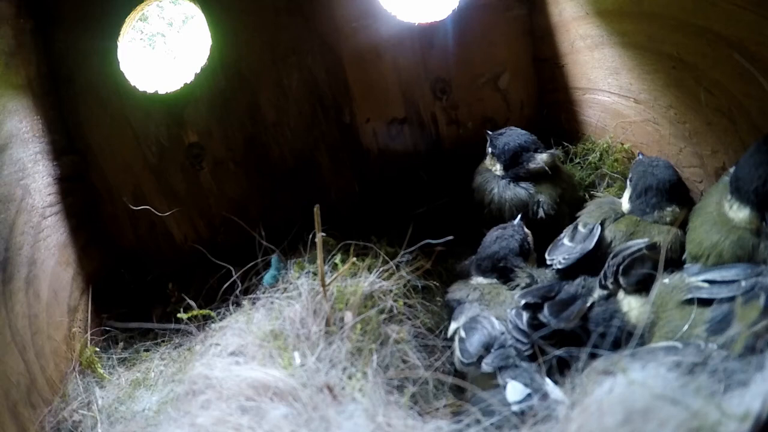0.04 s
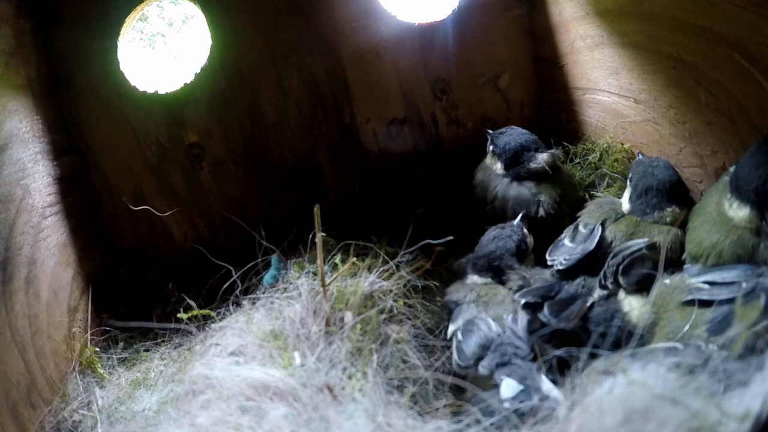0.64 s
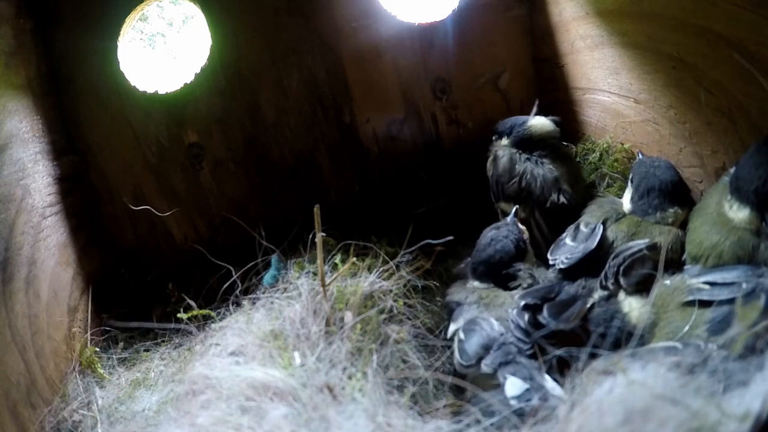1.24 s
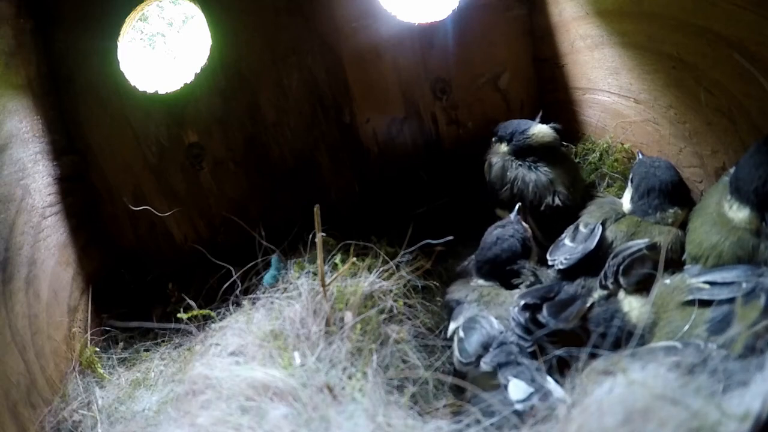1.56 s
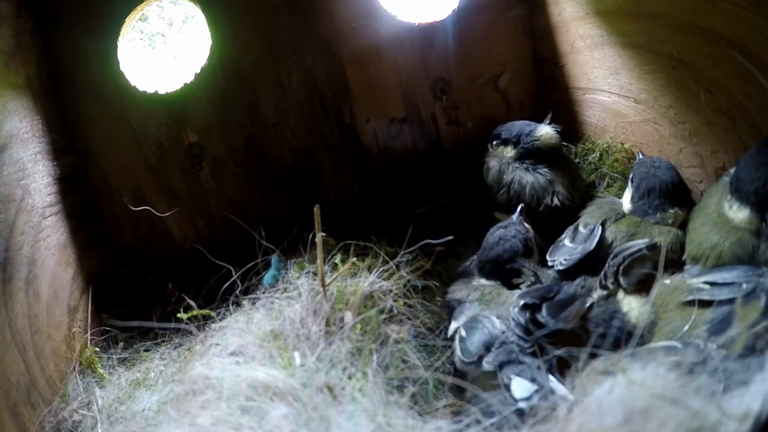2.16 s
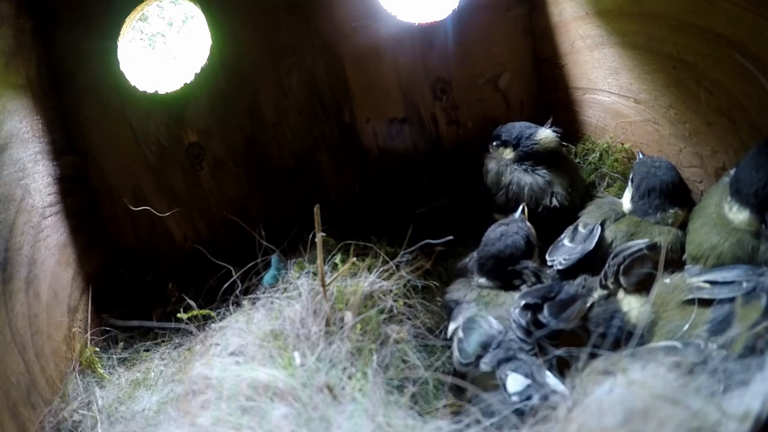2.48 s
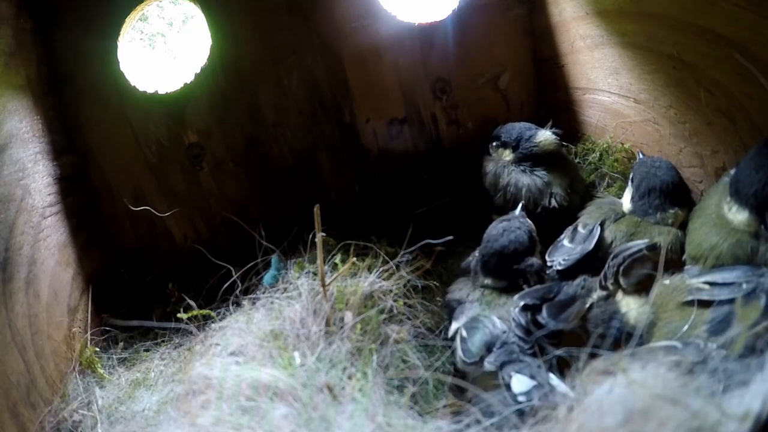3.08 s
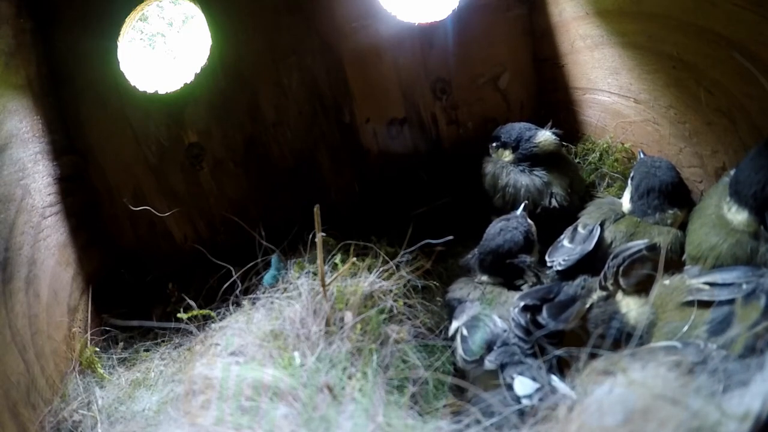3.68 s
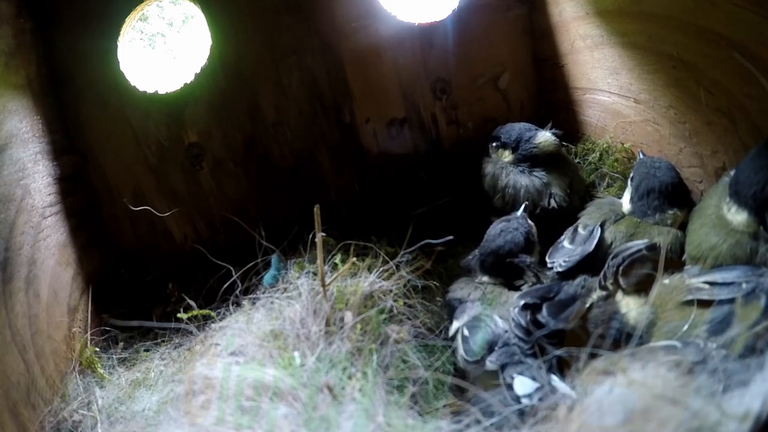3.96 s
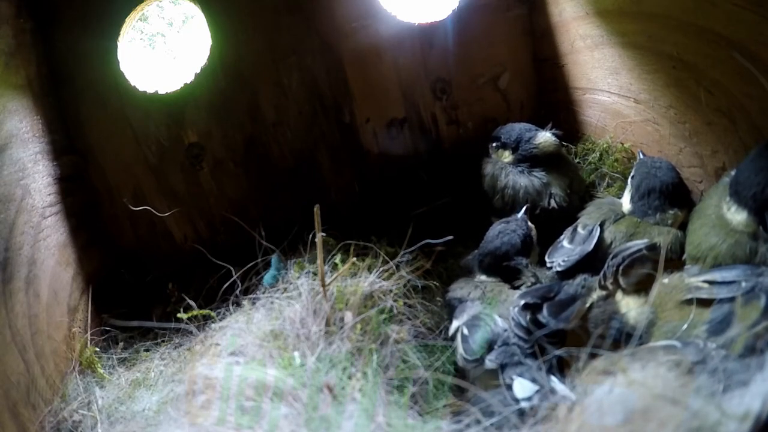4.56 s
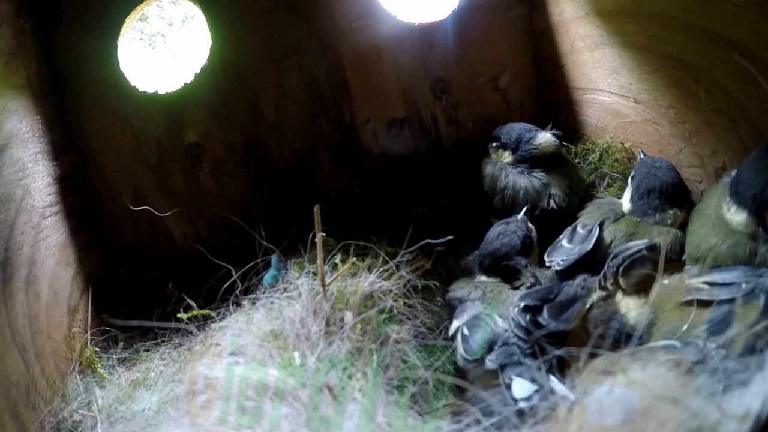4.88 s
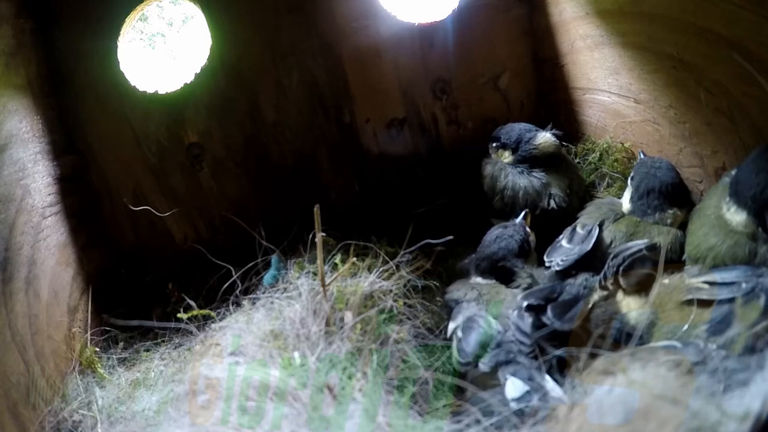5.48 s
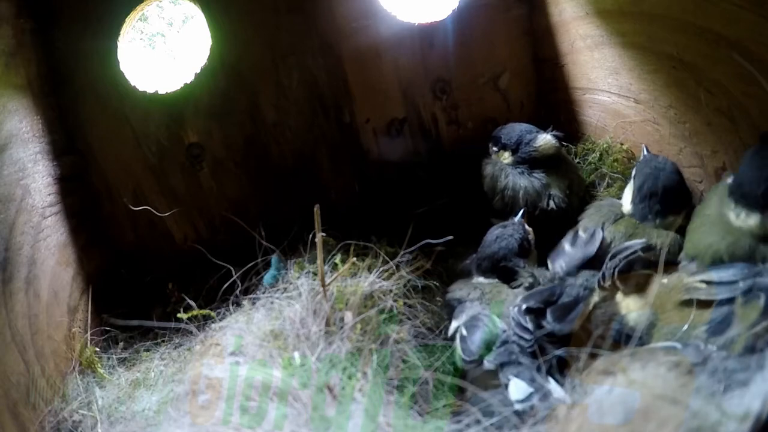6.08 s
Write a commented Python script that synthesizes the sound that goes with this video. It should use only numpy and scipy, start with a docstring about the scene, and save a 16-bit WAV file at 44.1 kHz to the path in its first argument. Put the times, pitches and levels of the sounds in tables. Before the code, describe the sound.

A songbird whistles outside a wooden nest box, then nestlings right by the microphone break into a rapid, raspy four-note chatter. They repeat it twice, a few seconds apart, over soft outdoor air, faint faraway calls and a low throbbing electrical hum. Near the end the sliding whistles return, two thin high calls ring from the trees, and a shuffling chick makes two dull, soft bumps as a low rumble grows.

```python
"""Tit nestlings in a wooden nest box give three bursts of four harsh chattering notes, each sung
by both sides of the syrinx at once. Outside, a songbird slides through fluty whistles, another gives
thin high calls, and faint calls echo from far off. Outdoor air murmurs in the box, a chick shuffles,
and electrical interference in the camera throbs about ten times a second."""
import sys
import numpy as np
from scipy import signal
from scipy.fft import rfft, irfft, next_fast_len
from scipy.io import wavfile
from scipy.ndimage import map_coordinates

SR = 44100
rng = np.random.default_rng(int(sys.argv[2]) if len(sys.argv) > 2 else 0)


def generate_wav(sig):
    """Save sig (samples, or channels by samples) to the path in sys.argv[1] as 16-bit PCM at SR."""
    pcm = np.round(np.clip(np.atleast_2d(sig).T, -1, 1) * 32767).astype(np.int16)
    wavfile.write(sys.argv[1], SR, pcm)


N = 279108
T = np.arange(N) / SR

# The chicks' notes. Each row: start and length in seconds, crest position as a share of the length,
# start and crest pitch in Hz, relative level in dB, harshness from 0 to 1, squeak lead in seconds.
NOTES = [(.601, 0.031, 0.65, 2883, 3210, -28.5, 1, 0.0067),
         (.684, .041, 0.99, 2720, 3056, -27, 0.78, 0.0062),
         (0.787, 0.047, .8, 2735, 3137, -26.5, 0.73, 0.0068),
         (.904, .049, 0.46, 2826, 3462, -25.5, 0.47, 0.0052),
         (2.438, .024, .6, 3050, 3040, -27.5, 0.96, 0.0034),
         (2.525, .044, 0.86, 2750, 3200, -27.5, 0.73, 0.006),
         (2.633, 0.043, 0.81, 2770, 3230, -27.5, 0.8, 0.0042),
         (2.763, 0.04, 0.322, 2945, 3528, -28.5, 0.76, 0.0099),
         (5.436, 0.0052, 0.99, 3040, 3170, -30, 0.8, 0), (5.52, 0.033, 0.91, 2764, 3120, -29.5, 1, 0.0099),
         (5.623, .035, 0.92, 2770, 3230, -27.5, .7, 0.0097),
         (5.744, 0.037, 0.47, 2794, 3444, -25.5, 0.54, 0.01)]


def chatter(jitter=0.0443, roughness=0.35, sag=0.087, shimmer_db=2, swing=3.2, box_db=-10):
    """Two voices sweep up to a crest and sag; their overtones and mixtures make the note harsh."""
    # Overtones and mixtures. Each row: multiple of the low voice, multiple of the high voice.
    mixes = [(2, 0), (1, 1), (0, 2), (-1, 2), (2, -1), (3, -1), (3, 0), (2, 1), (1, 2), (0, 3), (2, 2)]
    # The relative strength of each of these in dB.
    mix_db = [-1, -4.5, 1, -36, -40, -8, -4.5, -9, -7.5, -10.5, -46]
    # The low voice rings on alone, pure and strong. Each row: start and length in seconds, gain in dB.
    solos = [(2.77, 0.0155, 7.5)]
    # Rasp in the voice. Each row: frequency in Hz, relative noise density in dB.
    rasp_colour = [(1000, -34), (1600, 10), (3200, 36), (5000, 24.5), (7000, 23.5), (10000, -13),
                   (15000, -22.5)]
    # Resonances of throat, beak and box. Each row: frequency in Hz, gain in dB.
    throat = [(800, -47), (1600, 11.5), (2150, -13), (2750, -2.5), (3450, 2), (4400, 0.5), (4900, -3),
              (5350, -2.5), (6300, 3.5), (7200, 8.5), (8000, -4.5), (9000, -14), (11000, -22), (15000, -24)]
    # Where the chicks sit. Each row: frequency in Hz, left over right in dB.
    chick_side = [(1700, 1), (2700, -16), (4000, 0.5), (5200, 14), (6500, 13.5), (9500, 18), (14000, -27)]
    voice = squeaks()
    shakes = np.array([wobble(1800), wobble(1800), wobble(1400), wobble(1400)])
    shimmer = [amp(db + shimmer_db * wobble(300)) for db in mix_db]
    rasp = noise(rasp_colour)[0]
    for start, length, crest, start_hz, crest_hz, db, harshness, _ in NOTES:
        span = slice(int((start - .02) * SR), int((start + length + .03) * SR))
        t = T[span] - start
        pitch_shake, level_shake = shakes[:2, span], shakes[2:, span]
        climb_s = length * crest
        rise, pressure_db, high_share, unrest = chatter_gesture(t, climb_s, length)
        overtone_db = 155 * (length - 0.04)  # longer notes are pushed harder and sound brighter
        for solo_start, solo_length, gain_db in solos:
            alone = gate(T[span], solo_start, solo_start + solo_length, .0012, 0.00099)
            high_share = high_share * (1 - alone)
            pressure_db = pressure_db + gain_db * alone
            overtone_db = overtone_db - 4.5 * alone  # a lone voice has weaker overtones
        droop = 1 - sag * np.tanh(np.maximum(t - climb_s, 0) / 0.0118) ** 2
        low_hz = (start_hz + (crest_hz - start_hz) * rise) * droop
        high_hz = (1.252 + 0.0293 * rise) * low_hz  # a major third up, wider at the crest
        clash = np.minimum(high_share, 1) * harshness * unrest  # the voices disturb each other
        low_phase = turns(low_hz * (1 + jitter * clash * pitch_shake[0]))
        high_phase = turns(high_hz * (1 + jitter * clash * pitch_shake[1]))
        low_size, high_size = 1 + roughness * clash * level_shake
        tone = low_size * np.sin(low_phase) + high_share * high_size * np.sin(high_phase)
        tone += clash * rasp[span]
        for (m, n), strength in zip(mixes, shimmer):
            size = amp(overtone_db) * strength[span] * high_share ** abs(n)
            size *= (low_size if m else 1) * (high_size if n else 1)
            tone += size * np.sin(m * low_phase + n * high_phase + 2 * np.pi * rng.random())
        tone = swing * np.tanh(tone / swing)  # the membranes can only swing so far
        opening = gate(t, 0, length + 0.0054, 0.0027, 0.0021)  # the low voice outlasts the high one
        voice[span] += amp(db + pressure_db + 2) * opening * tone
    boxed = voice + amp(box_db) * echoes(voice, t60=0.062, delay=0.0007)
    return panned(coloured(boxed, throat), chick_side)


def chatter_gesture(t, climb_s, length, onset_db=-2.5, fade_db=-5.5, tail_db=-1):
    """One push of breath shapes a note's pitch rise, pressure, high voice and harshness."""
    climbed = np.clip(t / climb_s, 0, 1)
    rise = np.sin(np.pi / 2 * climbed ** 1.79) ** 2  # lingers, then swings up to a rounded crest
    from_middle = np.clip(2 * t / length - 1, -1, 1)
    tail = (1 + np.tanh((t - length) / .002)) / 2
    pressure_db = np.where(from_middle < 0, onset_db, fade_db) * from_middle ** 2 + tail_db * tail
    clarity = np.exp(-((climbed - 0.57) / 0.16) ** 2)  # clearest just past halfway through the climb
    high_share = amp(-1.65 + 2 * clarity) * (1 - tail)
    unrest = 1 - 0.56 * clarity
    return rise, pressure_db, high_share, unrest


def squeaks(jitter=0.018, pitch_ratio=1.97, level_db=-29, overlap_s=.007):
    """A thin pure tone, about an octave up, sounds just before the two voices break in."""
    out, shake = np.zeros(N), wobble(1300)
    for start, _, _, start_hz, *_, lead in NOTES:
        if lead > 0:
            span = slice(int((start - lead - .01) * SR), int((start + overlap_s + .01) * SR))
            opening = gate(T[span], start - lead, start + overlap_s, 0.00074, 0.0016)
            hz = pitch_ratio * start_hz * (1 + jitter * shake[span])
            out[span] += amp(level_db) * opening * np.sin(turns(hz))
    return out


def songbird(direct_db=-1, garden_db=-6, ear_lag_s=0.000096):
    """Sliding whistles come in through the hole, with the echo of the garden."""
    # The song. Each row: start and length in seconds, start, middle and end pitch in Hz,
    # relative level in dB, hoarseness from 0 (clean) to about 1.
    melody = [(0.173, 0.059, 3020, 3140, 3300, -33, 0.15), (0.184, 0.058, 2420, 2670, 2750, -38, .2),
              (0.263, 0.23, 1764, 1726, 1718, -41.5, 0.12), (0.465, 0.079, 1700, 1506, 1390, -45.5, 0),
              (4.791, 0.072, 2295, 2030, 1820, -49, 1.05), (4.796, 0.043, 2600, 2640, 2550, -47.5, 0.96),
              (4.92, .226, 2233, 1956, 1860, -39, 0.05), (5.204, .057, 2250, 2330, 2490, -40, 0.06),
              (5.249, 0.034, 2420, 2077, 2420, -35, 0.4), (5.274, 0.043, 2350, 2360, 2290, -38.5, 0.17),
              (5.512, 0.085, 1960, 1825, 1790, -40, 0.25), (5.587, .1, 1880, 2110, 1797, -38, 1.05),
              (5.64, 0.039, 3210, 3183, 3140, -33, 0.3), (6.208, 0.04, 2880, 2930, 2960, -40.5, 0.08),
              (6.243, .074, 2965, 3257, 2870, -24, 0.03), (6.305, 0.041, 2920, 2770, 2690, -29.5, 0)]
    song = sum(whistle(slide(*note), jitter=0.0046 + 0.05 * hoarseness, overtone_db=-15)
               for *note, hoarseness in melody)
    song = coloured(song, [(3500, 0), (4400, -21), (6500, -18)])  # distance dulls the overtones
    direct = filtered(song, lambda hz: np.exp(1j * np.pi * hz * ear_lag_s * np.array([[1], [-1]])))
    garden = amp(garden_db) * echoes(song, t60=0.3, delay=0.0018)
    return panned(amp(direct_db) * direct + garden, [(1700, -1), (2300, 2.5), (3100, -1.5)])


def slide(start, length, start_hz, middle_hz, end_hz, db, attack=0.25, release=0.27, edge_db=-5.5):
    """The course of a sung note: one smooth bend, with attack and release as shares of its length."""
    progress = np.linspace(0, 1, 60)
    bend = np.polyfit([0, .5, 1], [start_hz, middle_hz, end_hz], 2)
    edge = np.maximum(1 - progress / attack, 0) ** 2 + np.maximum(1 - (1 - progress) / release, 0) ** 2
    return np.transpose([start + progress * length, np.polyval(bend, progress), db + edge_db * edge])


def whistle(course, jitter, overtone_db):
    """A nearly pure note. Each row of its course: time in seconds, pitch in Hz, level in dB."""
    times, hz, db = np.transpose(course)
    span = slice(int((times[0] - .02) * SR), int((times[-1] + .02) * SR))
    t, out = T[span], np.zeros(N)
    shake = jitter * wobble(600)
    phase = turns(np.interp(t, times, hz) * (1 + shake[span]))
    level = amp(np.interp(t, times, db)) * gate(t, times[0], times[-1], 0.0041, 0.0083)
    out[span] = np.sqrt(2) * level * (np.sin(phase) + amp(overtone_db) * np.sin(2 * phase))
    return out


def thin_calls(arch_s=.047, drop_s=0.012, buzz_jitter=0.044, direct_db=-2, garden_db=-2.5):
    """High calls from the trees arch, drop into a short buzz and trail off in an echo."""
    # Each row: start in seconds, top pitch in Hz, relative levels of the arch and the buzz in dB.
    high_notes = [(5.769, 7810, -32.5, -39), (5.935, 8000, -39.5, -38)]
    calls = np.zeros(N)
    for start, *shape in high_notes:
        buzzing = np.clip((T - start - arch_s - drop_s) / (drop_s / 2), 0, 1)
        course = arch_and_buzz(start, *shape, arch_s, drop_s)
        calls += whistle(course, jitter=.007 + buzz_jitter * buzzing, overtone_db=-21)
    garden = amp(garden_db) * echoes(calls, t60=0.37, delay=0.0042)
    return panned(amp(direct_db) * calls + garden, [(6000, 9.8), (7800, 19)])


def arch_and_buzz(start, top_hz, arch_db, buzz_db, arch_s, drop_s):
    """The course of a thin call: it climbs ever more slowly, drops, lands with an accent and fades."""
    rise_hz, landing_hz, buzz_hz, buzz_s = 648, 5830, 6300, 0.047
    swell_db, lull_db, accent_db, fade_db = 5, -16, 11.5, -9
    to_go = np.linspace(1, 0, 8)
    bow = to_go ** 2
    arch = np.transpose([start + arch_s * (1 - to_go), top_hz - rise_hz * bow, arch_db - swell_db * bow])
    landing = start + arch_s + drop_s
    drop = [(landing - drop_s / 2, (top_hz + landing_hz) / 2, buzz_db + lull_db),
            (landing, landing_hz, buzz_db + accent_db)]
    buzz = [(landing + drop_s / 2, buzz_hz, buzz_db), (landing + buzz_s, buzz_hz, buzz_db + fade_db)]
    return np.vstack([arch, drop, buzz])


def far_calls(level_db=-3):
    """Distant callers are heard mostly by their echo."""
    # Each row: start and length in seconds, start and end pitch in Hz, relative level in dB.
    far_notes = [(1.25, 0.17, 3140, 3120, -59), (1.84, 0.071, 3780, 3540, -53),
                 (3.0, 0.073, 3600, 3530, -57), (3.655, 0.078, 807, 808, -49.5),
                 (4.58, 0.27, 580, 577.4, -51.5)]
    calls = sum(whistle([(start, hz, db), (start + length, end_hz, db)], jitter=0.032, overtone_db=-30)
                for start, length, hz, end_hz, db in far_notes)
    return amp(level_db) * (.5 * calls + echoes(calls, t60=0.24, delay=.003))


def air(mid_db=-50, side_db=-43, rumble_db=-46.5, swell_from_s=3.05, waver_db=1.6):
    """Outdoor murmur and microphone hiss, over a slowly growing rumble in the box."""
    # Centre and width of the air, and the rumble. Each row: frequency in Hz, relative density in dB.
    mid_colour = [(120, -21.5), (200, -0.5), (248, -11.5), (276, -3), (440, -18), (499, -8.5), (619, -15),
                  (795, -15.5), (870, -14), (3780, -21), (4140, -22.5), (9780, -22.5), (14500, -40)]
    side_colour = [(120, -18), (200, 0), (355, -4), (388, 1.5), (499, -0.5), (901, -2.5), (1410, -8),
                   (1720, -10.5), (2090, -14.5), (2590, -16.5), (3400, -24.5), (9780, -21), (14500, -40.5)]
    rumble_colour = [(20, -37), (100, -37), (118, -27), (140, -3.5), (190, 3.5), (260, -1), (400, -11.5),
                     (900, -19.5), (2000, -43.5)]
    # The bed leans to the right. Each row: frequency in Hz, left over right in dB.
    lean = [(150, -7), (400, -5.5), (900, -1), (3800, 0), (5500, -6), (9500, -10.5), (14000, -2)]
    mid = amp(mid_db) * noise(mid_colour)[0]
    side = amp(side_db) * noise(side_colour)[0]
    swell_db = 0.8334 * np.maximum(T - swell_from_s, 0) ** 2
    rumble = amp(rumble_db + swell_db + waver_db * wobble(15)) * noise(rumble_colour, channels=2)
    murmur = np.array([mid + side, mid - side]) * amp(0.094 * wobble(3.1))
    return panned(murmur + rumble, lean)


def shuffles():
    """A chick gives the wooden wall soft feathered bumps."""
    # Each row: time of the peak in seconds, half length in seconds, level in dB.
    bumps = [(6.102, 0.016, -31), (6.32, 0.026, -36.5)]
    # The wall's dull thud. Each row: frequency in Hz, relative noise density in dB.
    wall = [(90, -34), (140, -12), (230, 9.5), (450, -14), (1000, -12.5), (2000, -30), (6000, -52)]
    push = sum(amp(db) * np.exp(-((T - peak) / width) ** 2) for peak, width, db in bumps)
    return panned(push * noise(wall), [(200, -17), (1000, -1)])


def throb(first_s=.1152, period_s=.1024, pulse_db=12):
    """Evenly spaced electrical pulses, heard as a low fluttering hum toward the right."""
    # The tone of a pulse. Each row: frequency in Hz, gain in dB.
    pulse_colour = [(10, -31), (25, -22), (55, -23), (105, -34), (122, -22), (142, 1.5), (180, -1.5),
                    (220, -15), (280, -16), (350, -20), (600, -62)]
    times = np.arange(first_s, T[-1], period_s)
    pulses = np.zeros(N)
    pulses[(times * SR).astype(int)] = amp(pulse_db)
    return coloured(pulses, pulse_colour) * amp([[-4.5], [4.5]])


def amp(db):
    """Decibels as an amplitude factor."""
    return 10 ** (np.asarray(db) / 20)


def along(points, hz):
    """A curve through (Hz, value) points on a log frequency axis."""
    knots_hz, values = np.transpose(points)
    return np.interp(np.log(hz + 1), np.log(knots_hz + 1), values)


def wobble(rate):
    """A wandering random curve, rate knots a second."""
    return map_coordinates(rng.standard_normal(int(N * rate / SR) + 4), [T * rate], order=1)


def filtered(x, response):
    """x through a response given as a function of frequency."""
    size = next_fast_len(N + SR // 2)
    return irfft(rfft(x, size) * response(np.fft.rfftfreq(size, 1 / SR)), size)[..., :N]


def coloured(x, spectrum):
    """x through a (Hz, dB) curve."""
    return filtered(x, lambda hz: amp(along(spectrum, hz)))


def noise(spectrum, channels=1):
    """Coloured noise of rms 1."""
    x = coloured(rng.standard_normal((channels, N)), spectrum)
    return x / np.sqrt(np.mean(x ** 2) + 1e-20)


def panned(x, side):
    """Share the power between the ears by a (Hz, left over right dB) curve."""
    def gains(hz):
        ratio = amp(along(side, hz))
        return np.array([ratio, np.ones_like(ratio)]) * np.sqrt(2 / (1 + ratio ** 2))
    return filtered(x, gains)


def echoes(x, t60, delay):
    """The diffuse stereo tail of x, dying by 60 dB in t60 seconds."""
    t = np.arange(int(.8 * SR)) / SR
    tail = rng.standard_normal((2, len(t))) * amp(-60 * t / t60) * (t > delay)
    return signal.fftconvolve(x[None], tail / np.linalg.norm(tail[0]), axes=1)[:, :N]


def turns(hz):
    """The phase of a moving pitch, in radians."""
    return 2 * np.pi * np.cumsum(hz) / SR


def gate(t, start, end, rise, fall):
    """A smooth opening and closing."""
    return (1 + np.tanh((t - start) / rise)) * (1 + np.tanh((end - t) / fall)) / 4


def scene():
    """Chicks up close, birds outside, and the quiet bed of the nest box."""
    return chatter() + songbird() + thin_calls() + far_calls() + air() + shuffles() + throb()


def record(dry, rolloff_hz=14500, top_hz=14900):
    """The sound opens after a moment and keeps nothing above the camera's band limit."""
    opening = amp(np.interp(T, [.09, .113], [-60, 0]))
    return filtered(dry * opening, lambda hz: (hz < top_hz) / (1 + (hz / rolloff_hz) ** 80))


dry = scene()
out = record(dry)
generate_wav(out)
```